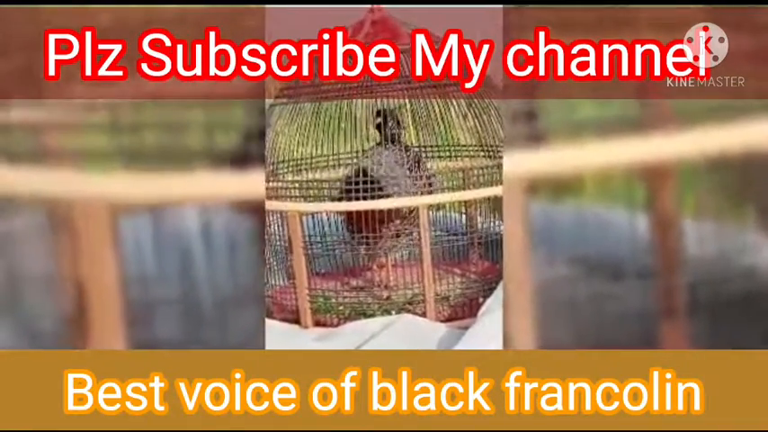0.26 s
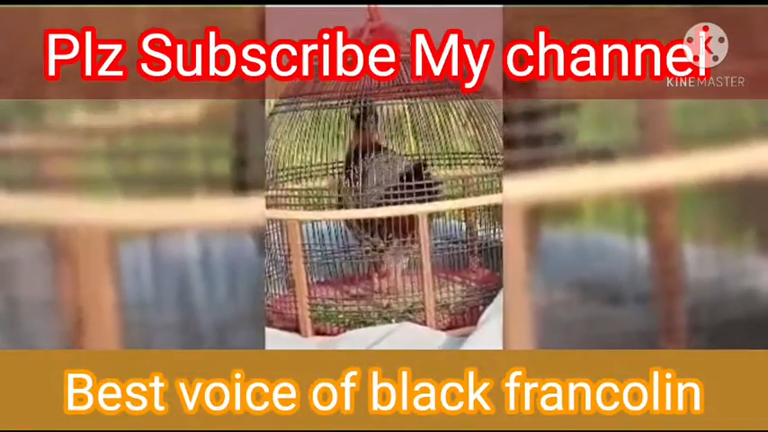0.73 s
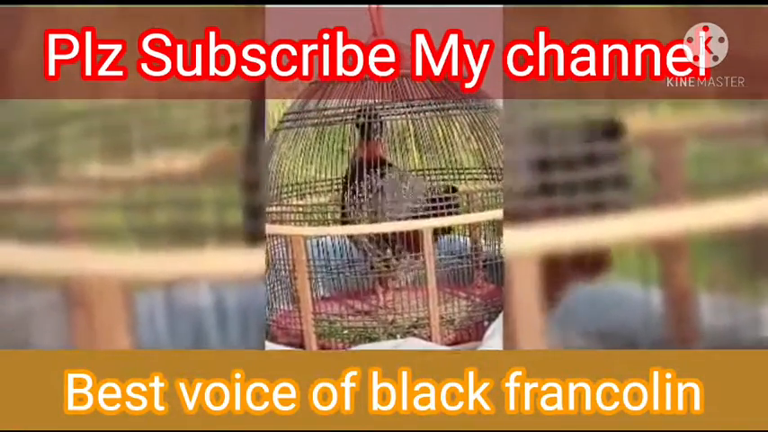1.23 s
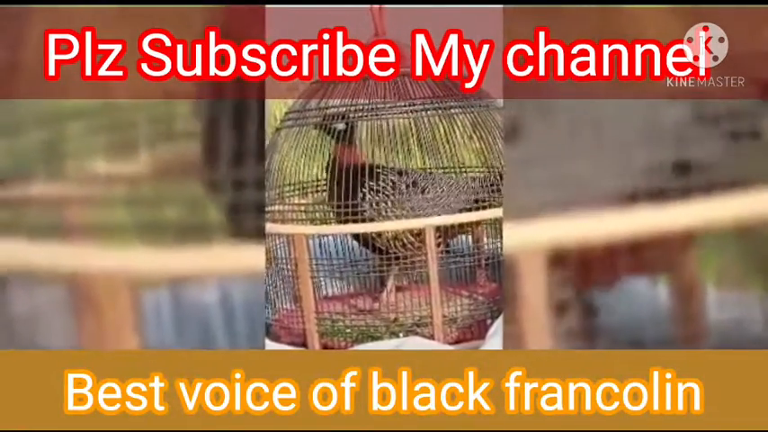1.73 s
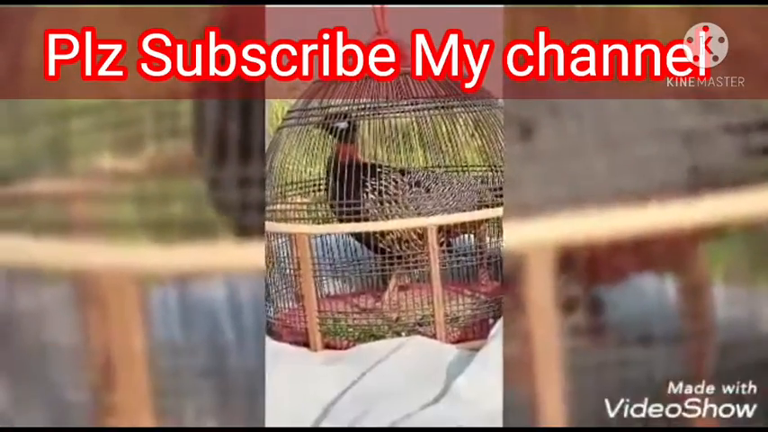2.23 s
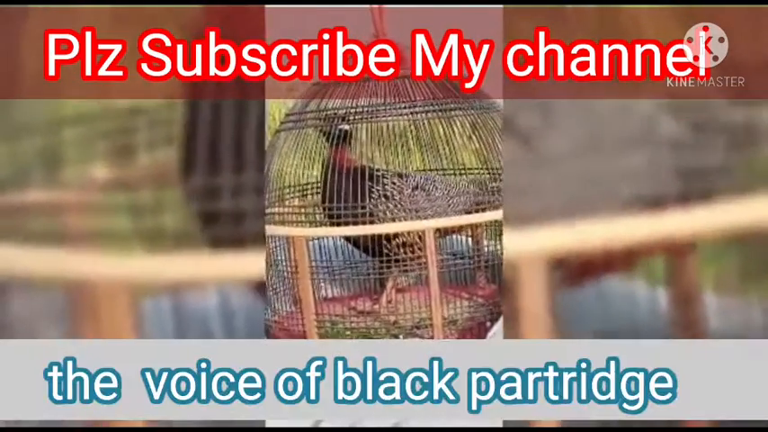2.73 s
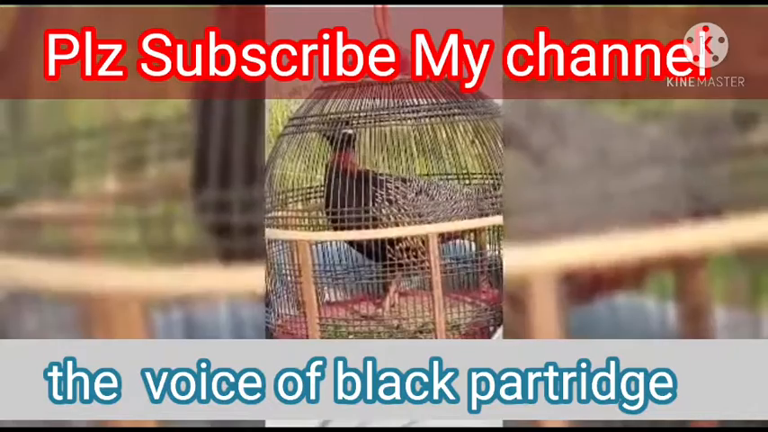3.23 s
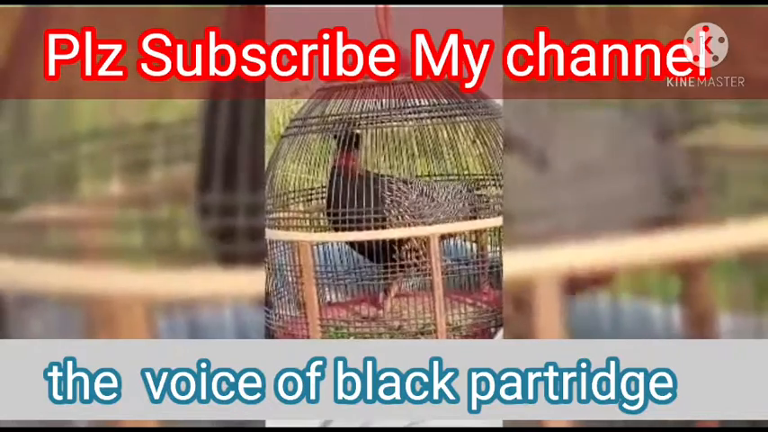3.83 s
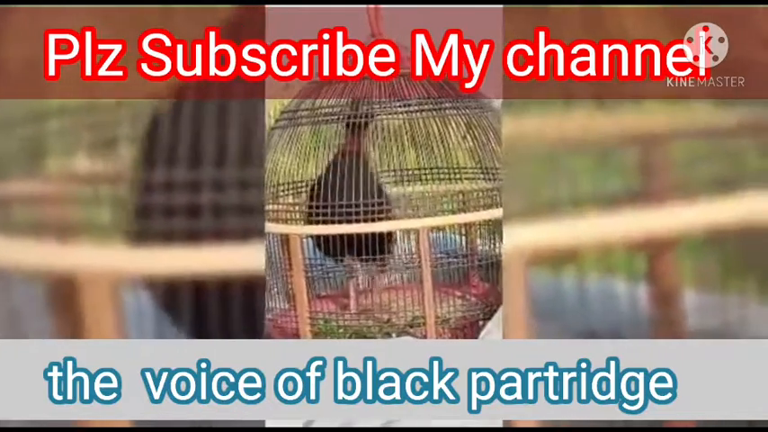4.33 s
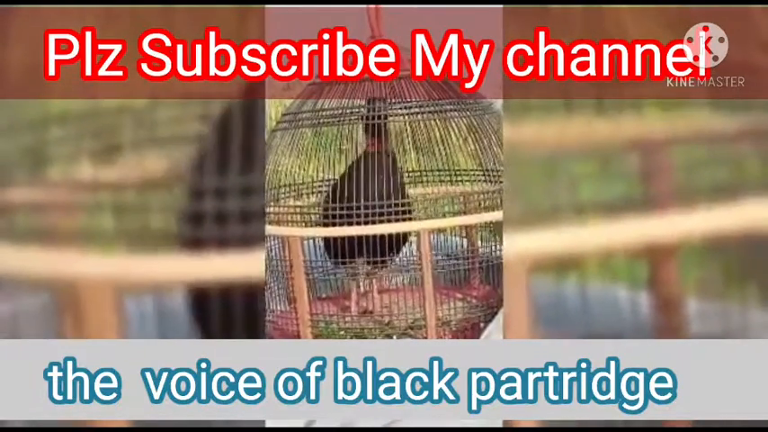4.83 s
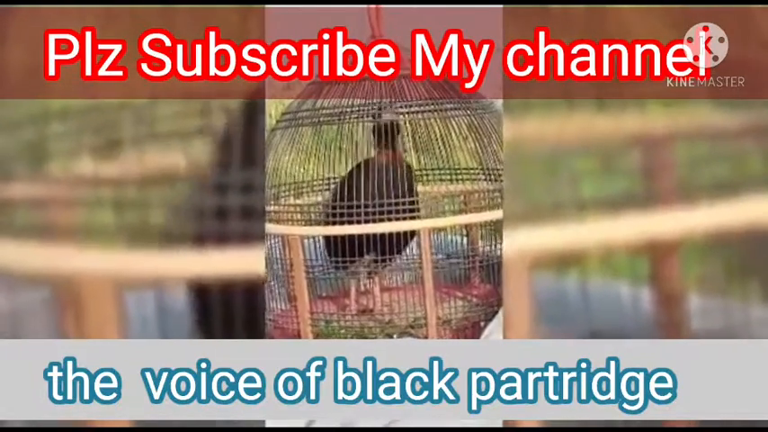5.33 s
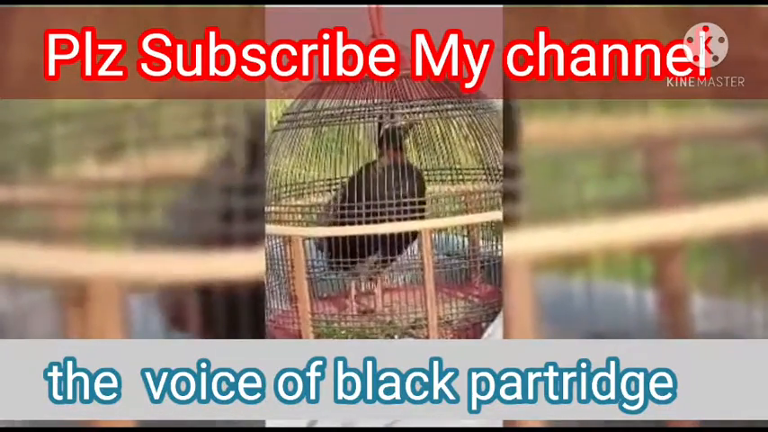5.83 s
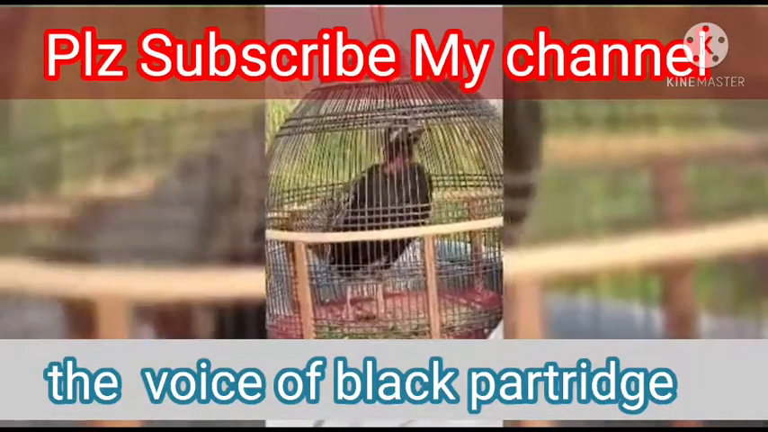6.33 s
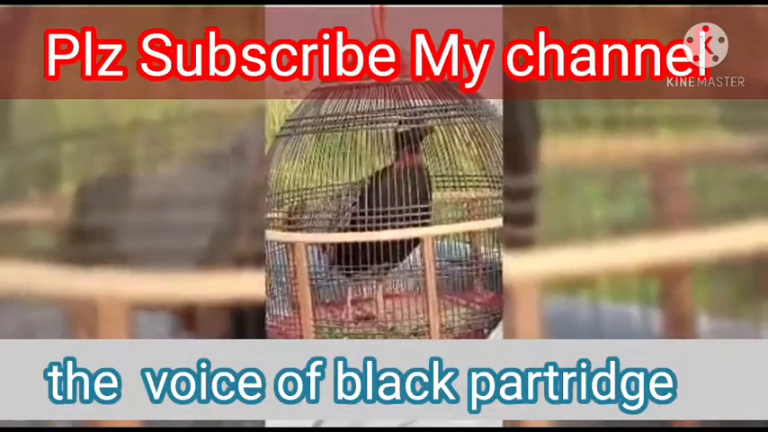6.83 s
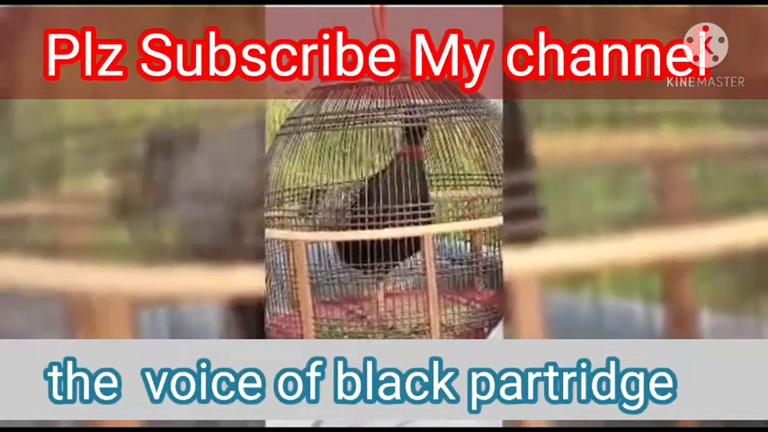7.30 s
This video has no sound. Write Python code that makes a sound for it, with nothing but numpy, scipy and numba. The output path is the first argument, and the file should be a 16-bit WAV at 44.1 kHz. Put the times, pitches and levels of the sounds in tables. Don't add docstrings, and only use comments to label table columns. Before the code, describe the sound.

Soft outdoor rumble and far birds for five seconds, then a loud black game bird snaps a high whistle and grates four buzzing notes.

```python
import sys
import numpy as np
from scipy import signal
from scipy.fft import rfft, irfft, next_fast_len
from scipy.io import wavfile
from scipy.ndimage import uniform_filter1d
from numba import njit

SR = 44100
rng = np.random.default_rng(int(sys.argv[2]) if len(sys.argv) > 2 else 0)


def generate_wav(signal):
    frames = np.transpose(np.atleast_2d(signal))
    scaled = np.clip(frames, -1, 1) * 32767
    pcm = np.round(scaled).astype(np.int16)
    wavfile.write(sys.argv[1], SR, pcm)


def convert_level_to_amplitude(level_db):
    exponent = np.asarray(level_db, float) / 20
    return 10 ** exponent


N = 333396
TIME = np.arange(N) / SR

# f/Hz, level/dB per Hz
YARD_COLOUR = [(18, -46), (30, -10.5), (86, 0), (199, -1.5), (287, -5), (328, -13), (404, -12.5),
               (666, -13), (962, -19), (3580, -23.5), (5170, -37), (14800, -39), (16000, -52.5)]
YARD_DB, YARD_DB_PER_S = -66, -0.1595
# t/s, level/dB
MOTOR_SWELL = [(0.0, -65.5), (0.44, -67.5), (1.05, -71), (1.54, -78), (1.91, -72), (2.27, -75),
               (2.61, -69.5), (3.54, -72), (5.33, -89.5), (5.71, -72), (6.23, -68.5), (6.82, -86),
               (7.56, -74)]
MOTOR_DB = [-8, -5, -13, -5.5, 1.5, -14, -13, -11.5, -13, -14.5, -17, -12, -11.5, -10.5]
MOTOR_HZ = 56.55
MOTOR_DULL_PER_DB = 0.1

# t/s, length/s, first f/Hz, last f/Hz, level/dB
SONG_NOTES = [(0.581, 0.043, 3800, 3140, -74), (.824, 0.0047, 1200, 1556, -60.5),
              (0.893, 0.043, 3074, 2737, -71.5), (.998, 0.0223, 4030, 3495, -75),
              (2.10, 0.0405, 3816, 3597, -80.5), (2.13, .013, 3310, 2954, -75),
              (2.139, 0.0137, 2500, 2383, -75), (2.18, .035, 3090, 2850, -80),
              (3.713, 0.15, 1050, 1060, -82), (4.032, 0.0111, 3945, 3473, -66),
              (4.202, 0.0203, 3720, 3450, -79), (4.409, 0.032, 1963, 2126, -78.5),
              (4.458, 0.0406, 1980, 1946, -81.5), (6.962, .023, 2437, 2560, -79.5)]
# t/s, pitch factor, level/dB
UPTICK_NOTES = [
    (0, 0.0207, 2750, 3030, 0.5),
]
UPTICK_TIMES = [
    (.982, 0.968, -73.5),
    (1.185, 0.894, -77),
    (1.398, 0.95, -77),
    (1.609, 1.01, -76.5),
    (2.524, 0.96, -78),
]
PAIR_NOTES = [
    (0, 0.0192, 3072, 3186, 0),
    (.022, 0.01054, 3400, 3478, -5.5),
    (.032, 0.0202, 3500, 3166, -2),
]
PAIR_TIMES = [
    (4.347, 0.886, -69.5),
    (6.177, 0.968, -71.5),
    (6.678, 1.01, -71.5),
    (7.209, 0.943, -74),
]
TUMBLE_NOTES = [
    (0, 0.043, 3900, 3809, -11),
    (.047, .018, 3760, 2995, -11),
    (.062, .029, 2850, 2910, -0.22),
    (.091, .034, 2189, 2760, -4.5),
    (.128, .03, 2150, 2700, -8.5),
    (.17, .024, 2143, 2520, -7.5),
]
TUMBLE_TIMES = [
    (6.808, 1.001, -66.5),
    (7.354, .96, -71),
]
GLIDE_BY_MIDDLE = 0.8
SONG_ECHO_DB, SONG_T60_S = -13, 0.15

# t/s, length/s, top f/Hz, level/dB, falling tail level/dB
CHICK_PEEPS = [
    (0.917, 0.0595, 2100, -81.5, -85),
    (1.118, 0.0535, 2118, -81.5, -79.5),
    (1.335, .053, 2057, -82.5, -91),
    (1.546, .057, 2081, -83, -90),
    (1.761, 0.054, 2130, -84, -83),
    (1.978, 0.055, 2065, -84, -99),
    (2.238, 0.038, 2037, -88.5, -99),
    (2.46, 0.049, 2055, -91.5, -99),
]
PEEP_PARTIALS_DB = [-9, 5, -3, -7]
PEEP_RISE_HZ, PEEP_FALL_HZ = 125.7, 40
TAIL_S, TAIL_LEAD_S, TAIL_FALL_HZ, TAIL_DULL_DB = 0.016, 0.007, 480, -1

# t/s, level/dB, centre f/Hz, width/Hz, decay/s
CAGE_TICKS = [
    (1.455, -85.5, 6000, 1500, 0.0053),
    (2.225, -84, 7600, 2000, 0.0078),
    (2.283, -75.5, 8100, 1500, 0.0018),
    (2.455, -84.5, 8200, 2000, 0.0027),
    (2.798, -79, 7700, 2500, .002),
    (3.083, -68, 8800, 3000, 0.0011),
    (5.413, -67, 2450, 4000, 0.0023),
    (5.419, -62, 5970, 9340, 0.00126),
    (6.423, -58, 2500, 4010, 0.00124),
]

# t/s, length/s, middle f/Hz, glide/Hz, level/dB
WHISTLE_TONES = [
    (4.948, 0.01504, 3830, -200, -18.5),
    (4.963, 0.01415, 2510, 39.5, -10.5),
    (4.976, .013, 1690, 70, -27.5),
    (5.021, .011, 1685, -55.5, -36.5),
    (4.988, .023, 6720, 199.5, -23.5),
    (5.0064, .0135, 6440, -280, -22.5),
    (5.953, 0.0083, 5850, -50.5, -22),
    (5.958, 0.0144, 6850, 32.5, -27.5),
    (6.509, 0.0117, 6980, -150, -19.5),
]
# f/Hz, arch/Hz, loudest at share of note, even partials level/dB, partial 3 level/dB
WHISTLE_REGISTERS = [(1690, 5, 0.4, -19.5, -30.5), (2500, 40, 0.5815, -34.5, -25),
                     (3800, 200, 0.845, -1, -28), (5850, 5, .3, -19.5, -55), (6440, 15, .45, -0.5, -55),
                     (6700, 270, .45, -8.5, -55), (6900, 250, 0.54, -9, -55)]
WHISTLE_FALL_DB, FOURTH_DB = 35.5, -19
# t/s, length/s, first f/Hz, last f/Hz, level/dB
REGISTER_SLIDES = [
    (4.965, 0.02, 5220, 3700, -34.5),
    (4.979, .011, 7700, 8450, -32),
    (4.985, 0.00531, 3386, 6100, -27.5),
    (5.02, .0025, 6340, 3770, -21.5),
    (5.0204, 0.002, 8990, 8400, -14.5),
    (5.024, .008, 2985, 2990, -32.5),
    (5.967, 0.0036, 6620, 2990, -35),
    (6.509, 0.0051, 4600, 6770, -23),
    (6.511, 0.00347, 6900, 3153, -33),
]
# t/s, level/dB, centre f/Hz, width/Hz, decay/s
VOICE_SNAPS = [
    (4.959, -27, 7400, 10700, 0.0009),
    (4.973, -26, 8565, 2460, 0.0012),
    (4.974, -33, 8540, 12750, 0.0034),
    (4.984, -19, 7000, 9100, 0.002),
    (5.021, -24, 5430, 7900, 0.0018),
    (5.021, -32.5, 416, 778.1, 0.0012),
    (4.986, -47.5, 399.6, 797, .002),
]

# t/s, length/s, level/dB, flutter f/Hz, sag over the note/dB
RASP_NOTES = [
    (5.431, 0.1873, -15.5, 281.2, 2.5),
    (5.757, 0.26183, -16, 284.2, 5.5),
    (6.266, 0.11657, -17, 273.8, 1.5),
    (6.432, 0.17394, -17.5, 277.1, 2.5),
]
# t/s, f/Hz
MEMBRANE_CURVES = [
    [(5.434, 2606), (5.461, 2933), (5.527, 3030), (5.585, 3138), (5.606, 1541)],
    [(5.76, 1311), (5.785, 2450), (5.808, 2959), (5.853, 3050), (5.95, 2414), (5.975, 2510), (6.006, 1287)],
    [(6.268, 1299), (6.288, 2450), (6.305, 2960), (6.344, 3031), (6.356, 2500), (6.368, 1350)],
    [(6.432, 1322), (6.452, 2333), (6.475, 2924), (6.51, 3107), (6.562, 2794), (6.582, 2354), (6.596, 1288)],
]
MEMBRANE_OVERTONES_DB = [5.5, 0, -5, -16.5, -18]
# t/s, length/s
RASP_BREAKS = [
    (5.96, 0.0125),
    (6.512, .005),
]
# f/Hz, level/dB
THROAT_COLOUR = [(1800, -35.5), (2500, -16.5), (2740, -24.5), (2900, 0), (3600, 5.5), (4500, 2.5),
                 (5800, -2), (6500, -24), (7400, -10), (8800, -3), (9900, -13), (11000, -21.5),
                 (14300, -25.5), (15400, -18)]
# f/Hz, level/dB
WINDPIPE_COLOUR = [(2800, 3.5), (3020, 2.5), (3300, -3.5), (3520, 0), (3950, -2), (4150, -0.5),
                   (4400, -2.5), (4900, -0.5), (5100, 0), (5400, -1.5), (6000, 0.5)]
# f/Hz, level/dB
BEAK_COLOUR = [(10500, 1.5), (11200, -2.5), (11800, 6), (12400, -5), (13000, 5), (13700, -4.5),
               (14200, 2.5), (14800, 1), (15500, 1), (15800, -9)]
ATTACK_S, SWELL_S, DROOP_S, RELEASE_S = 0.006867, 0.02395, 0.02, 0.02026
START_DB, KNEE_DB, DROOP_DB, END_DB = -24.5, -4, -3, -49
UPPER_DB, UPPER_PER_DB, UPPER_MOST_DB = -5.5, 0.57, -4.5
TIGHT_HZ, BARE_DB, BARE_DB_PER_KHZ, BARE_MOST_DB = 3050, -26.5, 17.5, -12.5
ROUGH, ROUGH_PER_DB = 0.31, -0.0352
FLUTTER_PER_DB = 0.003
THIRD_DB, THIRD_LOWEST_HZ = -3.5, 7550

ROOM_DB, ROOM_T60_S, ROOM_ENDS_S, ECHO_S, ECHO_DB = -38.5, 0.35, 0.07, 0.041, -44
TOP_HZ = 15850


def colour(x, points):
    hz, db = np.transpose(points)
    size = next_fast_len(len(x))
    bins_hz = np.arange(size // 2 + 1) * SR / size
    gain = convert_level_to_amplitude(np.interp(np.log(bins_hz + 1), np.log(hz), db))
    return irfft(rfft(x, size) * gain, size)[:len(x)]


def unit(x):
    return x / np.sqrt(np.mean(x ** 2))


def walk(rate, size=N):
    k = max(int(SR / rate), 1)
    return unit(uniform_filter1d(uniform_filter1d(rng.standard_normal(size), k), k))


def fade(size, seconds):
    ramp = np.minimum(np.arange(size), np.arange(size)[::-1]) / (seconds * SR)
    return np.sin(np.pi / 2 * np.clip(ramp, 0, 1)) ** 2


def mix(pieces):
    out = np.zeros(N)
    for span, sound in pieces:
        out[span] += sound
    return out


def chirp(s, length_s, first_hz, middle_hz, last_hz, db, partial_db=(0,)):
    u = np.linspace(-1, 1, int(length_s * SR))
    bend_hz = (last_hz + first_hz) / 2 - middle_hz
    hz = middle_hz + (last_hz - first_hz) / 2 * u + bend_hz * u ** 2
    turn = 2 * np.pi * np.cumsum(hz) / SR
    sound = sum(convert_level_to_amplitude(db + p) * np.sin((k + 1) * turn) for k, p in enumerate(partial_db))
    return slice(int(s * SR), int(s * SR) + len(u)), np.sqrt(2) * sound * fade(len(u), 0.1 * length_s)


def yard():
    s, motor_db = np.transpose(MOTOR_SWELL)
    air = unit(colour(rng.standard_normal(N), YARD_COLOUR))
    rumble = colour(air, [(900, 6.5), (1800, -42.5)])
    hiss = air - rumble
    swell_db = np.interp(TIME, s, motor_db)
    turn = 2 * np.pi * np.cumsum(MOTOR_HZ * (1 + 0.0018 * walk(1.5))) / SR
    dull_db = MOTOR_DULL_PER_DB * (swell_db - max(motor_db))
    drone = sum(convert_level_to_amplitude(db + 1.4 * walk(5) + k * dull_db) * np.sin((k + 1) * turn + k * k)
                for k, db in enumerate(MOTOR_DB))
    rumble = rumble * convert_level_to_amplitude(YARD_DB + YARD_DB_PER_S * TIME + 0.6 * walk(6))
    hiss = hiss * convert_level_to_amplitude(-67 + 0.6 * walk(5))
    return rumble + hiss + drone * convert_level_to_amplitude(swell_db)


def songbird_note(s, length_s, first_hz, last_hz, db):
    middle_hz = first_hz + GLIDE_BY_MIDDLE * (last_hz - first_hz)
    return chirp(s, length_s, first_hz, middle_hz, last_hz, db)


def songbird_motif(shape, sung):
    return [songbird_note(s + late_s, length_s, pitch * first_hz, pitch * last_hz, db + own_db)
            for s, pitch, db in sung
            for late_s, length_s, first_hz, last_hz, own_db in shape]


def smear(x):
    t = TIME[:int(0.25 * SR)]
    tail = rng.standard_normal(len(t)) * convert_level_to_amplitude(-60 * t / SONG_T60_S)
    tail = tail / np.sqrt(np.sum(tail ** 2))
    return x + convert_level_to_amplitude(SONG_ECHO_DB) * signal.fftconvolve(x, tail)[:N]


def chick_peep(s, length_s, hz, db, tail_db):
    top_hz = hz - PEEP_FALL_HZ
    tail_partials_db = PEEP_PARTIALS_DB + TAIL_DULL_DB * np.arange(len(PEEP_PARTIALS_DB))
    rise = chirp(s, length_s, hz - PEEP_RISE_HZ, hz, top_hz, db, PEEP_PARTIALS_DB)
    tail = chirp(s + length_s - TAIL_LEAD_S, TAIL_S, top_hz, top_hz - 0.3 * TAIL_FALL_HZ,
                 top_hz - TAIL_FALL_HZ, tail_db, tail_partials_db)
    return [rise, tail]


def snap(s, db, hz, width_hz, decay_s):
    t = np.arange(int(10 * decay_s * SR)) / (decay_s * SR)
    edges = np.clip([hz - width_hz / 2, hz + width_hz / 2], 40, 18000)
    band = signal.butter(3, edges, "bandpass", fs=SR, output="sos")
    noise = signal.sosfilt(band, rng.standard_normal(len(t) + 400))[400:]
    return slice(int(s * SR), int(s * SR) + len(t)), convert_level_to_amplitude(db) * unit(noise) * np.e * t * np.exp(-t)


def whistle(s, length_s, hz, glide_hz, db):
    _, arch_hz, loudest, even_db, third_db = min(WHISTLE_REGISTERS, key=lambda r: abs(r[0] - hz))
    u = np.linspace(0, 1, int(length_s * SR))
    pitch_hz = hz + glide_hz * (u - 0.5) - arch_hz * (2 * u - 1) ** 2
    turn = 2 * np.pi * np.cumsum(pitch_hz) / SR
    partials_db = [0, even_db, third_db, even_db + FOURTH_DB]
    sound = sum(convert_level_to_amplitude(p) * np.sqrt(2) * np.sin((k + 1) * turn)
                for k, p in enumerate(partials_db) if (k + 1) * hz < 20000)
    sound = (sound + convert_level_to_amplitude(-30) * rng.standard_normal(len(u))) * fade(len(u), 0.0012)
    return slice(int(s * SR), int(s * SR) + len(u)), sound * convert_level_to_amplitude(db - WHISTLE_FALL_DB * (u - loudest) ** 2)


def slide(s, length_s, first_hz, last_hz, db):
    return chirp(s, length_s, first_hz, (first_hz + last_hz) / 2, last_hz, db, [0, -20])


@njit
def resonance(x, hz, damp):
    y, b, l = np.empty(len(x)), 0., 0.
    for i in range(len(x)):
        g = np.tan(np.pi * hz[i] / SR)
        v = (b + g * (x[i] - l)) / (1 + g * (g + damp))
        y[i] = damp * v
        b, l = 2 * v - b, l + 2 * g * v
    return y


def steady(x):
    return x / (uniform_filter1d(x ** 2, size=900) + 1e-12) ** 0.35


def fluttered_membrane(tone, flutter, rough):
    size = len(tone)
    side = np.arange(-6, 10)[:, None]
    weight = convert_level_to_amplitude(-1.1 * np.abs(side) - 3.9 * (side % 2) + 1.7 * (side == 0))
    voice = 0
    for k, db in enumerate(MEMBRANE_OVERTONES_DB):
        wobble = convert_level_to_amplitude(2.6 * np.array([walk(60, size) for _ in side]))
        turn = 0.26 * side ** 2 + (0.66 + 0.5 * k) * rng.standard_normal(side.shape)
        lines = weight ** (1 + 0.09 * k) * wobble * np.cos((k + 1) * tone + side * flutter + turn)
        voice = voice + convert_level_to_amplitude(db) * np.sum(lines, axis=0)
    breath = rng.standard_normal(size) * (1 + 0.5 * np.cos(flutter) + 1.0 * np.cos(2 * flutter))
    return (1 - rough) * unit(voice) + rough * breath, breath


def flutter_buzz(flutter, breath):
    size = len(flutter)
    first = convert_level_to_amplitude(-34.0 + 3.5 * walk(30, size)) * np.cos(flutter)
    second = convert_level_to_amplitude(-39.0 + 4.5 * walk(30, size)) * np.cos(2 * flutter)
    leak = colour(breath, [(60, -17.5), (200, 1), (800, -6.5), (1700, 4.5), (2600, -13), (4000, -37.5)])
    return first + second + convert_level_to_amplitude(-30) * unit(leak)


def rasp(s, length_s, level_db, flutter_hz, sag_db, membrane):
    span = slice(int(s * SR), int((s + length_s) * SR))
    t, held_s = TIME[span], length_s - RELEASE_S
    size = len(t)
    slow = TIGHT_HZ / membrane[0][1]
    effort_db = np.interp(t - s, [0, slow * ATTACK_S, slow * SWELL_S, held_s - DROOP_S, held_s, length_s],
                          [START_DB, KNEE_DB, 0, -sag_db, DROOP_DB - sag_db, END_DB])
    eased = np.clip(effort_db, -10, 0)
    rough = np.clip(ROUGH + ROUGH_PER_DB * eased, 0.05, 0.5)
    running = np.prod([np.clip(np.maximum(at - t, t - at - gap_s) / 0.002733, 0, 1)
                       for at, gap_s in RASP_BREAKS], axis=0)

    tone_hz = np.interp(t, *np.transpose(membrane))
    slack = np.clip((2800 - tone_hz) / 1000, 0, 1)
    jitter = 0.011 * walk(130, size) + (0.018 * rough + 0.045 * slack) * walk(360, size)
    tone = 2 * np.pi * np.cumsum(tone_hz * (1 + jitter)) / SR
    flutter_hz = flutter_hz * (1 + FLUTTER_PER_DB * eased)
    flutter_jitter = 0.0586 * rough * walk(120, size) + 0.025 * walk(25, size)
    flutter = 2 * np.pi * np.cumsum(flutter_hz * (1 + flutter_jitter)) / SR
    source, breath = fluttered_membrane(tone, flutter, rough)

    shaped = colour(source, THROAT_COLOUR)
    lower = colour(shaped, [(6300, 0), (6700, -60)])
    upper = shaped - lower
    third_hz = np.maximum(3 * uniform_filter1d(tone_hz, size=800), THIRD_LOWEST_HZ)
    upper = upper + convert_level_to_amplitude(THIRD_DB) * resonance(upper, third_hz, 0.17)
    upper_db = np.minimum(UPPER_DB - UPPER_PER_DB * effort_db, UPPER_MOST_DB)

    low_hz = np.minimum(tone_hz, 2480.) * (1 + 0.023 * walk(200, size))
    bare = resonance(resonance(0.3 * source + breath, low_hz, 0.3), low_hz, 0.3)
    bare = colour(bare, [(1100, -8), (1500, 2.5), (2150, -8), (2450, 0.5), (2600, 0.5), (2750, -20.5)])
    bare_db = np.minimum(BARE_DB + BARE_DB_PER_KHZ * (TIGHT_HZ - tone_hz) / 1000, BARE_MOST_DB)
    bare = unit(bare) * convert_level_to_amplitude(bare_db + 2.6 * walk(220, size))

    sound = unit(steady(colour(lower, WINDPIPE_COLOUR)))
    sound = sound + convert_level_to_amplitude(upper_db) * unit(colour(upper, BEAK_COLOUR))
    sound = sound + bare + flutter_buzz(flutter, breath)
    return span, sound * convert_level_to_amplitude(level_db + effort_db) * running * fade(size, 0.0043)


def walls():
    t = TIME[:int(0.2 * SR)]
    tail = rng.standard_normal(len(t)) * convert_level_to_amplitude(-60 * t / ROOM_T60_S)
    tail = tail * np.clip(t / 0.01, 0, 1) / (1 + np.exp((t - ROOM_ENDS_S) / 0.012))
    tail = tail * convert_level_to_amplitude(ROOM_DB) / np.sqrt(np.sum(tail ** 2))
    echo = convert_level_to_amplitude(ECHO_DB) * (np.arange(len(t)) == int(ECHO_S * SR))
    return colour(tail + echo, [(1500, -14.5), (4000, 0), (8000, 5.5), (14000, -5.0)])


def scene():
    song = [songbird_note(*row) for row in SONG_NOTES]
    song += songbird_motif(UPTICK_NOTES, UPTICK_TIMES)
    song += songbird_motif(PAIR_NOTES, PAIR_TIMES)
    song += songbird_motif(TUMBLE_NOTES, TUMBLE_TIMES)
    peeps = [part for row in CHICK_PEEPS for part in chick_peep(*row)]
    ticks = [snap(*row) for row in CAGE_TICKS]
    far = smear(mix(song)) + mix(peeps + ticks)

    call = [whistle(*row) for row in WHISTLE_TONES]
    call += [slide(*row) for row in REGISTER_SLIDES]
    call += [snap(*row) for row in VOICE_SNAPS]
    call += [rasp(*row, curve) for row, curve in zip(RASP_NOTES, MEMBRANE_CURVES)]
    bird = mix(call)
    echoes = signal.fftconvolve(bird, walls())[:N]
    return (yard() + far + bird + echoes)[None]


def band_limit(x):
    return signal.sosfilt(signal.butter(12, 16640, fs=SR, output="sos"), x)


def record(dry):
    bass_cut = signal.sosfilt(signal.butter(2, 38, "highpass", fs=SR, output="sos"), dry)
    top_cut = signal.ellip(8, 0.2, 50, TOP_HZ, fs=SR, output="sos")
    return band_limit(signal.sosfiltfilt(top_cut, bass_cut))


dry = scene()
out = record(dry)
generate_wav(out)
```